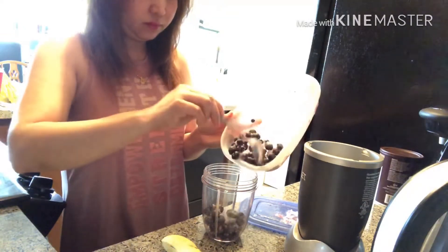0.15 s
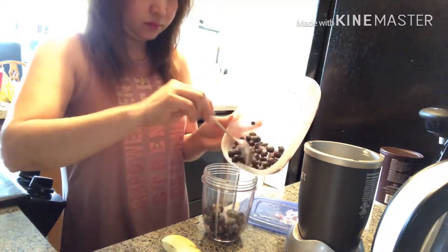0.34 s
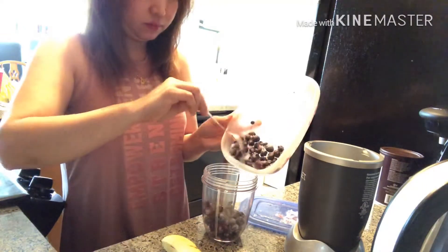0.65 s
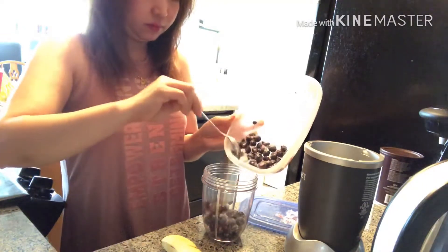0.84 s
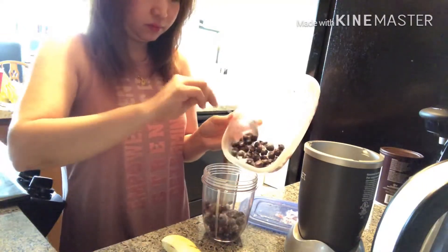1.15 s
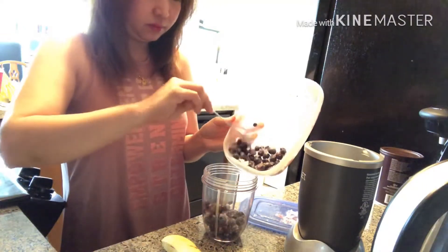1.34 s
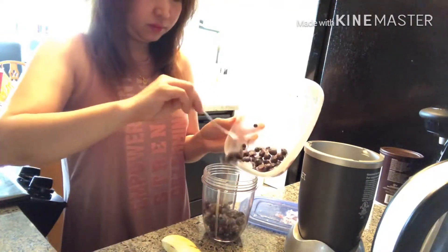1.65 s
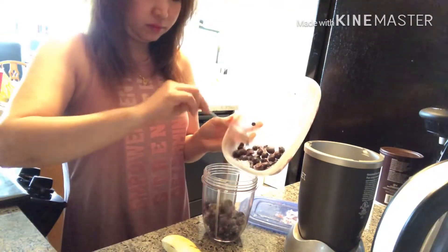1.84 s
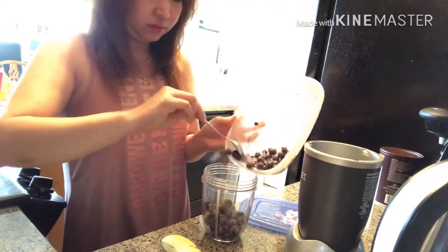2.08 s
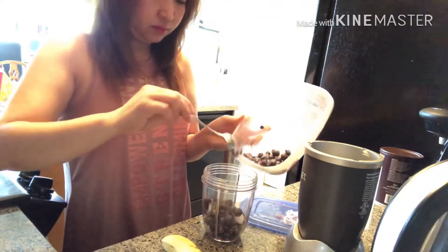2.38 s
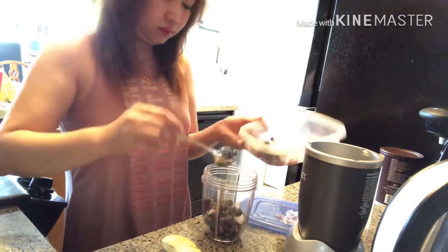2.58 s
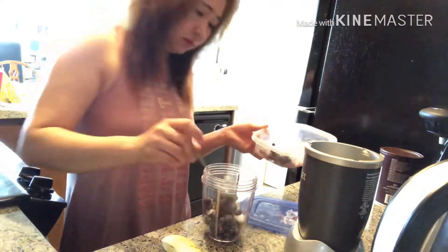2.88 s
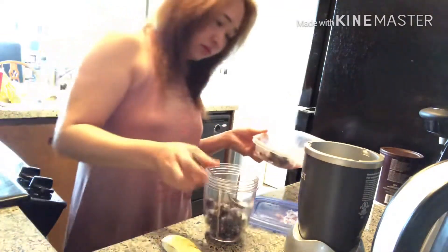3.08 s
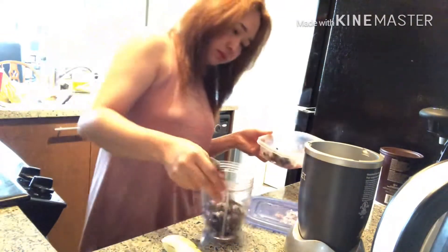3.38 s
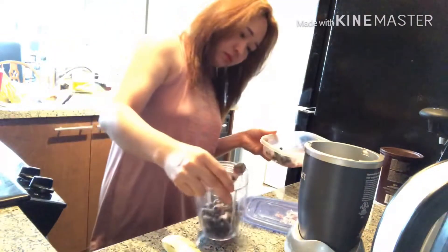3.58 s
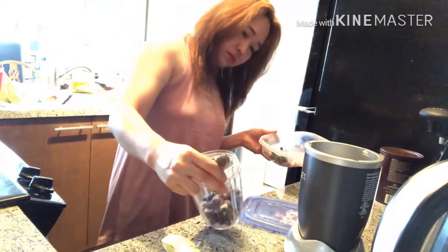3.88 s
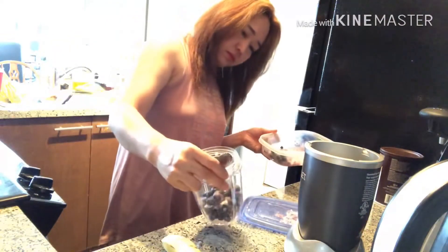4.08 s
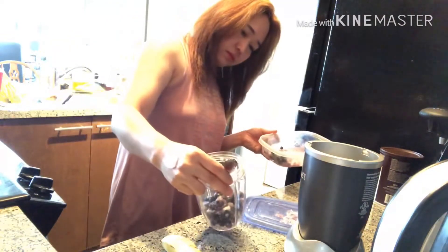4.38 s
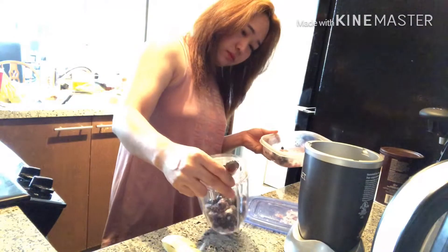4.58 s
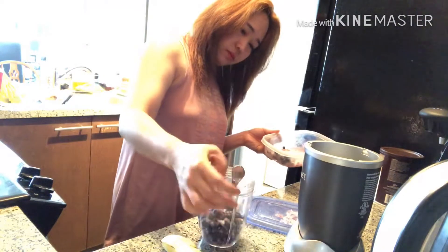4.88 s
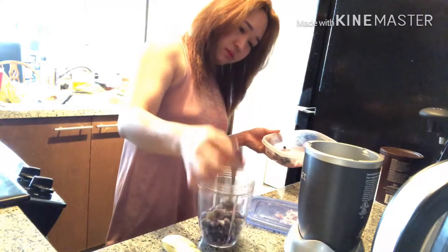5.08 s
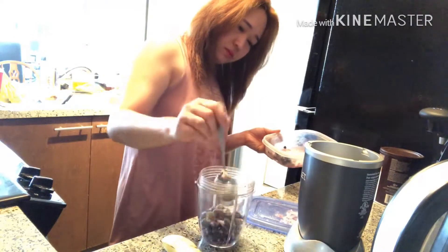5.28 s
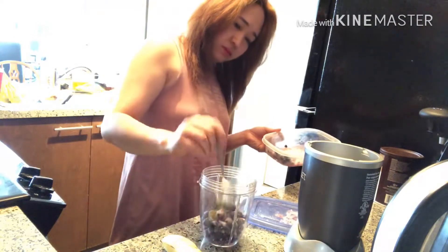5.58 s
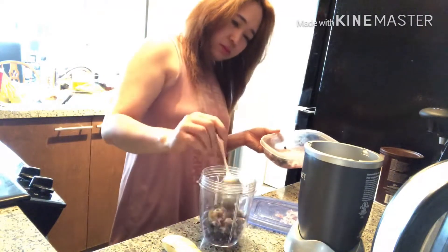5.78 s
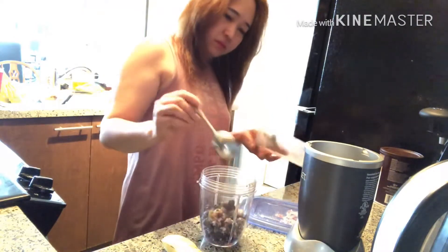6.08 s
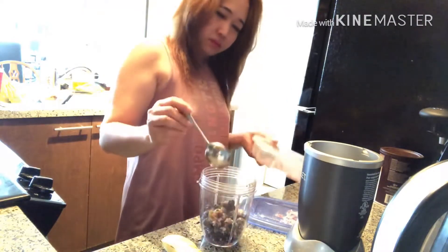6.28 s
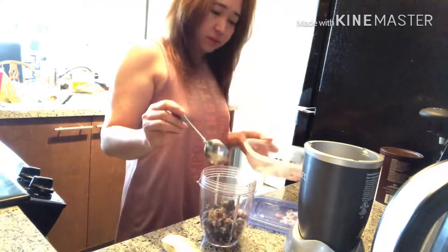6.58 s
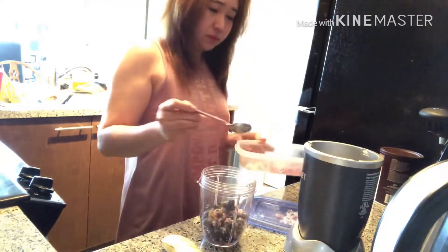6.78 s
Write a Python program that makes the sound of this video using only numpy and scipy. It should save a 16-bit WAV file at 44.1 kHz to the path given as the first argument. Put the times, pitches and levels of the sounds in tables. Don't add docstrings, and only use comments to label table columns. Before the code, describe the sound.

Icy berries clatter and rattle on plastic, followed by sparse cup knocks, bright spoon clinks and a short scrape in a small humming kitchen.

```python
import sys
import numpy as np
from scipy import signal
from scipy.fft import rfft, irfft, next_fast_len
from scipy.io import wavfile
from scipy.ndimage import uniform_filter1d, map_coordinates

SR = 44100
rng = np.random.default_rng(int(sys.argv[2]) if len(sys.argv) > 2 else 0)


def waveform_to_disk(signal):
    frames = np.transpose(np.atleast_2d(signal))
    scaled = np.clip(frames, -1, 1) * 32767
    samples = np.round(scaled).astype(np.int16)
    wavfile.write(sys.argv[1], SR, samples)


def magnitude_from_level(level_db):
    exponent = np.asarray(level_db, float) / 20
    return 10 ** exponent


N = 306043

# time in seconds, peak in dB, hollow
# knock in dB, strongest ring in Hz.
RAKED_BERRIES = [(.0403, -20, -32, 3530), (.1296, -14.5, -18, 2800), (.195, -36, -5, 2690),
                 (.2244, -42, -3, 2900), (.2897, -25, -17, 2750), (.3645, -19.5, -19, 1560),
                 (.4297, -20, -18, 1630), (.4724, -29.5, -4.5, 1430), (.5108, -26, -2, 1570),
                 (.5232, -27, -3, 1620), (.5718, -29, -2, 1690), (.5856, -15.5, -7.5, 2660),
                 (.7192, -9.5, -15.5, 2920), (.7567, -17.5, -11, 2640), (.8534, -17, -26, 1790),
                 (.9392, -31, -10, 1570), (.9669, -19.5, -10, 1570), (1.0158, -10.5, -24.5, 3010),
                 (1.0637, -21.5, -26, 1650), (1.0774, -26.5, -27, 1660), (1.1017, -23.5, -27, 4500),
                 (1.1445, -26.5, -26, 3650),
                 (1.279, -28, -20.5, 1370), (1.3026, -28, -13, 1330), (1.5089, -14, -34, 2880),
              (1.5836, -14, -11.5, 1640), (1.6336, -24.5, -5, 1860), (1.6764, -22, -8, 1620),
              (1.696, -18.5, -14, 2830), (1.7448, -24.5, -12, 1260), (1.7848, -19.5, -16.5, 1640),
              (1.8292, -27, -33, 2820), (1.8637, -30, -14.5, 1630), (1.8866, -20, -3, 4330),
              (1.9974, -24, -12, 1570), (2.149, -22, -22.5, 1720), (2.1752, -13.5, -18.5, 2970),
              (2.222, -15, -26, 3400), (2.255, -14, -16, 1730), (2.3296, -16, -7.5, 1850),
              (2.3675, -4.5, -26, 1680), (2.3996, -18, -10, 1630), (2.4373, -27.5, -13, 3600),
              (2.4859, -21, -9, 4800), (2.5284, -26.5, -33, 4000), (2.758, -27.5, -21, 3730),
              (2.7896, -30, -7, 1510), (2.8724, -30, 1, 2956), (2.8964, -39, 8, 1590),
              (2.9563, -28.5, 0, 1460), (2.9856, -34, -9, 3120)]
# time in seconds, peak in dB, hollow knock in dB,
# bright tick in dB, strongest ring in Hz.
CUP_HANDLED = [(3.1014, -6.5, -9.5, -9.5, 1830), (3.1725, -19.5, 5, -19.5, 3070),
               (3.1914, -22.5, .5, -18.5, 1670), (3.4144, -61, -5, 4, 1590), (3.5051, -18, -3, -25, 3300),
               (3.5222, -47, 18, -21, 4250), (3.7299, -47.5, -7, -11.5, 2880),
               (3.8477, -59, 10.5, -26, 1260), (3.8746, -43.5, -19, -24.5, 3160),
               (4.168, -55, -10, -9.5, 1370), (4.4944, -57, -3.5, -7, 1260), (4.6194, -60, -3.5, -11, 1270),
               (4.79, -6.5, 3.5, -21, 1530), (4.926, -25, -.5, -38, 2650), (4.9522, -34.5, 5, -25, 1700),
               (4.9776, -39, 1, -32, 1630)]
# time in seconds, peak in dB, hollow knock in dB,
# bright tick in dB, strongest ring in Hz.
CUP_POKED = [(5.3254, -5, -17, -26, 1680), (5.448, -8, -22, -24, 3500), (5.539, -35, -17, -2.5, 4500),
             (5.621, -43, -19, -14, 3760), (5.649, -37, -15, -15, 1680), (5.679, -53.5, -22, -12, 3890),
             (5.7538, -19, -11.5, -23, 2830), (5.8601, -28, -18, -13, 3470),
             (5.9853, -14.5, -22.5, -18.5, 1720), (6.0616, -22.5, -35, -40.5, 1740),
             (6.3127, -28, -7.5, -21, 1390), (6.4995, -16.5, -11.5, -16, 1430),
             (6.6084, -24, -22, -15, 1460)]
# time in seconds, level in dB.
LOOSE_BERRIES = [(.04, -40), (.26, -64), (.44, -48), (.64, -47), (.7, -58), (.97, -42), (1.2, -72),
                 (1.42, -44), (1.76, -41), (1.97, -60), (2.22, -43), (2.5, -52), (2.68, -72), (3.65, -62),
                 (4.1, -74), (5.25, -73), (5.88, -58), (6.2, -76)]
# start in seconds, rise in seconds, hold in seconds,
# level in dB, hollow part in dB.
STROKES = [(0, .002, .025, -33, -10), (.288, .004, .012, -41, -4), (.32, .04, .01, -39.5, -4),
           (.754, .004, .1, -27, -9), (.92, .02, .02, -47, -8), (1.278, .005, .03, -45, -5),
           (1.319, .004, .05, -31, -3), (1.48, .02, .008, -40, -5), (1.58, .005, .004, -35, -6),
           (1.998, .01, .05, -32, -8), (2.03, .03, .11, -28, -9), (2.245, .012, .025, -37, 0),
           (2.716, .01, .13, -47, -9), (2.87, .005, .025, -52, 14), (2.92, .04, .085, -46, 1),
           (3.106, .006, .04, -31, 7), (3.2, .01, .16, -59, 7), (4.82, .01, .09, -50, 0),
           (5.33, .004, .01, -43, -6), (5.453, .004, .06, -41, 0), (5.62, .01, .07, -57, -3),
           (5.732, .008, .025, -33, -12), (5.977, .01, .02, -34, -12), (6.33, .12, .12, -44, 3)]
# time in seconds, pressure in dB.
SCRAPE = [
    (6.22, -72),
    (6.328, -38),
    (6.496, -31.5),
    (6.632, -46.5),
    (6.662, -27),
    (6.68, -25),
    (6.75, -39),
    (6.81, -49),
    (6.94, -53),
]
# time in seconds, level in dB,
# favoured pitch in Hz, loss in dB per octave away.
CLINKS = [(3.101, -28, 9700, 32), (3.102, -42, 12600, 90), (3.505, -47.5, 6374, 50),
          (3.506, -58, 12600, 30), (5.327, -56, 8300, 25), (5.448, -32, 6374, 18), (5.449, -37, 14095, 120),
          (5.538, -54, 6374, 30), (5.573, -53, 14095, 130), (5.735, -47, 8300, 45),
          (5.736, -48, 14095, 110)]
# time in seconds, peak in dB, slow sway in dB.
THUDS = [(0.728, -49, -63), (1.334, -49.5, -80), (2.368, -47, -53), (2.874, -60, -58), (3.02, -45, -77.5),
         (3.104, -39.5, -53), (3.178, -41.5, -45), (3.511, -37, -67), (4.792, -29.5, -44.5),
         (4.933, -40.5, -57.5), (5.449, -43, -57), (5.762, -43.5, -52), (6.669, -41, -74)]

# center in Hz, width in Hz, level in dB.
TRAY = [(1130, 300, -16.5), (1687, 196, 3.5), (2800, 616, 1), (4330, 1390, 0), (6100, 2270, -8.5)]
# center in Hz, width in Hz, level in dB.
HEAP = [(370, 130, -3), (560, 170, -2), (720, 110, 1), (900, 200, -3)]
# center in Hz, width in Hz, level in dB.
SHEET = [(1940, 700, 3.5), (3440, 1000, 3.5), (5530, 1300, -1)]
# center in Hz, width in Hz, level in dB.
EMPTY_TRAY = [(630, 500, -4.5), (927, 76, 1.5), (1110, 52, 1.5), (1490, 67, -0.5)]
# center in Hz, width in Hz, level in dB.
CUP = [(355, 80, -9), (465, 40, -7), (630, 70, -4), (700, 35, 2), (730, 4, -1), (830, 70, -1)]
# center in Hz, width in Hz, level in dB.
COUNTER = [(90, 33, -25), (145, 42, 1.5), (285, 60, -3.5), (352, 20, -2)]
# pitch in Hz, time to fade by 60 dB in seconds.
STEEL = [(6374, .17), (7810, .11), (8570, .1), (8760, .1), (9959, .07), (12600, .2), (14095, .09)]
# frequency in Hz, level in dB.
BRIGHT = [(4000, -20), (6500, 3.5), (8000, 3.5), (9500, -1.5), (13000, -2), (16000, -4.5), (17500, -47)]
# frequency in Hz, time to fade by 60 dB in seconds.
ROOM_FADE = [(150, 0.6), (700, 0.19), (3000, 0.21), (12000, .15)]
# frequency in Hz, rms level in dB.
HUM = [(120, -62), (180, -54.5), (300, -69)]
# frequency in Hz, level in dB per Hz.
AIR = [(15, -61.5), (30, -27.5), (49, -20), (92, -11.5), (115, -7), (150, -11.5), (212, -21), (320, -20),
       (439, -30), (936, -31), (1940, -47.5), (7710, -53.5), (16000, -65.5)]


def raked():
    s, db, knock_db, hz = np.array(RAKED_BERRIES).T[:, :, None]
    spot, flex = rng.standard_normal((len(s), 2)).T[:, :, None]
    note_hz = np.where(hz > 2200, 690, 990 - 95 * s) * np.exp(0.06 * flex)
    tick_db = -23 + 4 * s + 3 * spot

    def knock(at, gain, t, push):
        life_s = 0.0045
        swell = np.exp(-t / life_s) * (1 - np.exp(-t / 0.0045))
        return lay(at, gain * magnitude_from_level(7.5) * swell * np.sin(2 * np.pi * note_hz * t))

    return contacts(s, db, knock_db, tick_db, hz, 0.0046, knock)


def dropped():
    s, db, knock_db, tick_db, hz = np.array(CUP_HANDLED + CUP_POKED).T[:, :, None]
    length_s = np.clip(0.004 + 0.0001 * knock_db, 1 / 2000, 1 / 50)
    cup = body(CUP)

    def hollow(f):
        return cup(f) / (1 + 1j * f / 1500) ** 2

    def knock(at, gain, t, push):
        shove = magnitude_from_level(12.5) * t / 0.00032 * np.exp(-t / 0.00019)
        return filtered(lay(at, gain * (shove + magnitude_from_level(3) * push(0.7))), hollow)

    return contacts(s, db, knock_db, tick_db, hz, length_s, knock)


def contacts(s, db, knock_db, tick_db, hz, length_s, knock):
    at = s[:, 0]
    t = np.arange(SR // 20) / SR

    def push(stretch):
        envelope = np.exp(-t / (stretch * length_s)) * (1 - np.exp(-t / (0.2 * length_s)))
        return envelope * rng.standard_normal((len(s), len(t)))

    ring = magnitude_from_level(-4.5) * np.exp(-t * hz / 4) * np.sin(2 * np.pi * hz * t)
    clack = shifting(filtered(lay(at, magnitude_from_level(db - 4.5) * push(0.91)), body(TRAY)))
    clack = clack + lay(at, magnitude_from_level(db) * ring)
    tick = filtered(lay(at, magnitude_from_level(db + tick_db + 9) * push(0.3)), bright)
    return clack + tick + knock(at, magnitude_from_level(db + knock_db), t, push)


def rolling():
    tables = [layered(LOOSE_BERRIES, -4, -8)]
    tables += [stroke(*row) for row in STROKES]
    berries = rattle(tables, TRAY, HEAP, rate=800, spread_db=11.5, life=0.0042, rub=0.18,
                     cycles=3, grain_db=-4)
    scrape = rattle([layered(SCRAPE, 1.5, -7)], SHEET, EMPTY_TRAY, rate=2100, spread_db=12, life=0.0012,
                    rub=0.8, cycles=3.5, grain_db=-8)
    return shifting(berries) + scrape


def stroke(start, rise, hold, db, hollow_db):
    top = start + rise
    end = top + hold
    end_db = db - 30 * hold
    curve = [(start, db - 18), (top, db), (end, end_db), (end + 40 / 420, end_db - 40)]
    bright_db = -7 + 1.8 * start if start < 2.8 else -7
    return layered(curve, hollow_db, bright_db)


def layered(curve, low_db, bright_db):
    return [(s, db, db + low_db, db + bright_db) for s, db in curve]


def rattle(tables, mid, low, rate, spread_db, life, rub, cycles, grain_db):
    gain, t = np.zeros((3, N)), np.arange(N) / SR
    for rows in tables:
        s, *levels = np.transpose(rows)
        span = (t >= s[0]) & (t <= s[-1])
        gain[:, span] += [magnitude_from_level(np.interp(t[span], s, db)) for db in levels]
    chance = rate / SR * magnitude_from_level(3 * wobble(40))
    hits = (rng.random(N) < chance) * magnitude_from_level(spread_db * rng.random(N))
    jolts = signal.fftconvolve(hits, np.exp(-np.arange(SR // 50) / SR / life))[:N]
    jolts = unit(rub + abs(unit(jolts)))
    noise = np.zeros(N)
    for level, response in zip(gain, (body(mid), body(low), bright)):
        noise += filtered(level * jolts * rng.standard_normal(N), response)

    active = gain[0] > magnitude_from_level(-100)
    at = np.flatnonzero(hits * active)
    center, width, _ = np.array(mid)[rng.integers(len(mid), size=N)].T
    pitch = center + 0.39 * width * rng.standard_normal(N)
    hz = np.clip(pitch, 500, 9000)[at, None]
    turns = hz * np.arange(SR // 150) / SR
    grains = hits[at, None] * np.exp(-turns / cycles) * np.sin(2 * np.pi * turns)
    grains /= np.sqrt(np.sum(grains ** 2) / np.sum(active))
    return noise + magnitude_from_level(grain_db) * lay(at / SR, gain[0][at, None] * grains)


def shifting(x):
    z = signal.stft(x, nperseg=256)[2]
    field = uniform_filter1d(rng.standard_normal(z.shape), size=4, axis=0)
    field = uniform_filter1d(field, size=3, axis=1)
    return signal.istft(z * magnitude_from_level(2.5 * unit(field) - 2.5), nperseg=256)[1][:N]


def bright(f):
    usual = np.sqrt(np.mean(magnitude_from_level(along(BRIGHT, np.arange(SR // 2))) ** 2))
    return magnitude_from_level(along(BRIGHT, f)) / usual


def body(modes):
    def shape(f):
        total = 0
        for k, (center, width, db) in enumerate(modes):
            damping = 1j * f * width
            total = total + (-1) ** k * magnitude_from_level(db) * damping / (center * center - f * f + damping)
        return total

    scale = np.sqrt(np.mean(abs(shape(np.arange(SR // 2) + 0.)) ** 2))
    return lambda f: shape(f) / scale


def spoon():
    s, db, favored, loss = np.array(CLINKS).T[:, :, None]
    hz, t60 = np.array(STEEL).T[:, :, None]
    t = np.arange(SR // 3) / SR
    modes = magnitude_from_level(-60 * t / t60) * np.sin(2 * np.pi * hz * t)
    strength = magnitude_from_level(db - loss * abs(np.log2(hz.T / favored)))
    return lay(s[:, 0], strength @ modes)


def counter():
    s, db, sway_db = np.transpose(THUDS)
    t = np.arange(SR // 50) / SR / 0.0014
    push = magnitude_from_level(db + 8.5)[:, None] * t * np.exp(-t)
    slow = np.arange(SR // 4) / SR
    sway = np.exp(-slow / 0.05) * (1 - np.exp(-slow / 0.015)) * np.sin(2 * np.pi * 47 * slow)
    return filtered(lay(s, push), body(COUNTER)) + lay(s, magnitude_from_level(sway_db + 9.5)[:, None] * sway)


def kitchen(x):
    out, step = np.zeros(N + SR), SR // 3
    for at in range(0, N, step):
        hz, _, z = signal.stft(rng.standard_normal(SR // 2), SR, nperseg=256)
        t = _
        fade = magnitude_from_level(-60 * t / along(ROOM_FADE, hz)[:, None])
        tail = signal.istft(z * fade, SR, nperseg=256)[1]
        wet = signal.fftconvolve(x[at:at + step], tail / np.linalg.norm(tail))
        out[at + 200:][:len(wet)] += wet
    return out[:N]


def refrigerator():
    t = np.arange(N) / SR
    tones = np.zeros(N)
    for hz, db in HUM:
        tones += np.sqrt(2) * magnitude_from_level(db + 1.7 * wobble(9.8)) * np.sin(2 * np.pi * hz * t)
    air = filtered(rng.standard_normal(N), lambda f: magnitude_from_level(along(AIR, f)))
    return tones + magnitude_from_level(-56.5) * unit(air)


def unit(x):
    return x / np.sqrt(np.mean(x ** 2) + 1e-20)


def along(points, hz):
    f, v = np.transpose(points)
    return np.interp(np.log(hz + 1), np.log(f + 1), v)


def wobble(rate):
    points = rng.standard_normal(int(N * rate / SR) + 4)
    return map_coordinates(points, [np.arange(N) * rate / SR])


def filtered(x, response):
    m = next_fast_len(N + SR // 2)
    return irfft(rfft(x, m) * response(np.fft.rfftfreq(m, 1 / SR)), m)[:N]


def lay(times, rows):
    start = np.round(np.asarray(times) * SR).astype(int)
    at = start[:, None] + np.arange(rows.shape[1])
    return np.bincount(at.ravel(), rows.ravel(), N + SR)[:N]


def scene():
    def thin(f):
        return (1j * f / (170 + 1j * f)) ** 3

    near = filtered(raked() + dropped() + rolling(), thin) + spoon() + counter()
    return (near + magnitude_from_level(-8) * kitchen(near) + refrigerator())[None]


def low_pass(x):
    return signal.sosfilt(signal.butter(12, 16990, fs=SR, output="sos"), x)


def record(dry):
    def band(f):
        return np.where(f < 15900, 1, magnitude_from_level(-25)) * (1j * f / (36 + 1j * f)) ** 2

    return low_pass(filtered(dry[0], band)[None])


dry = scene()
out = record(dry)
waveform_to_disk(out)
```